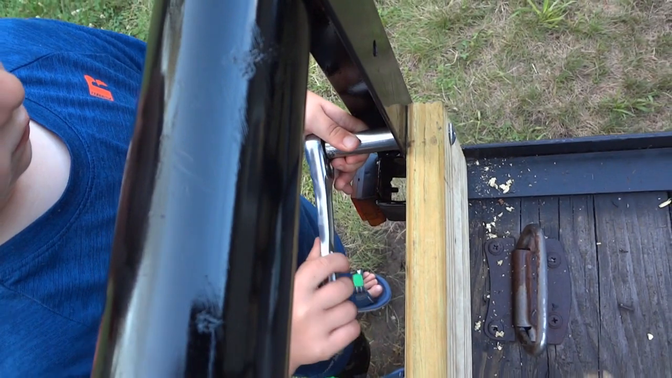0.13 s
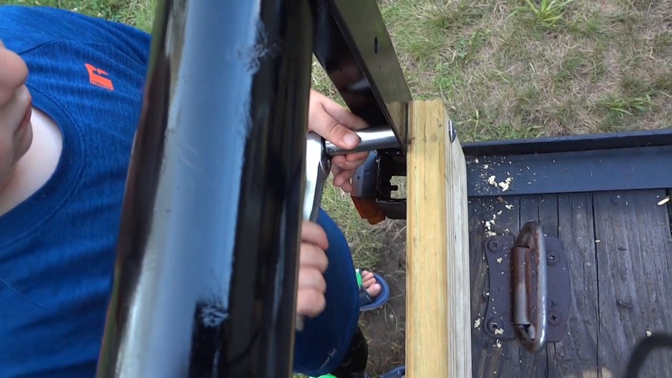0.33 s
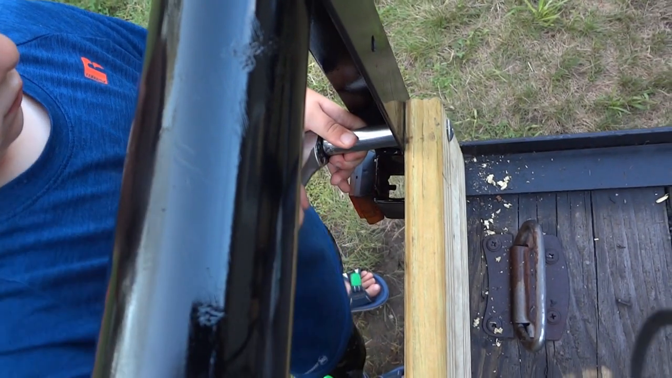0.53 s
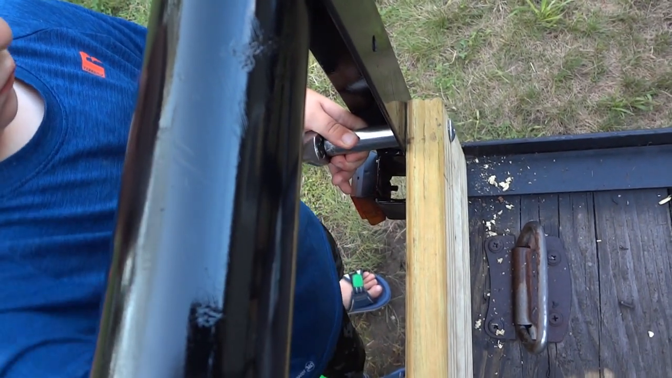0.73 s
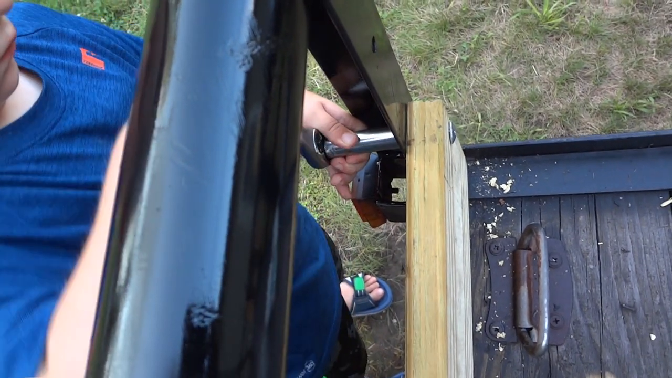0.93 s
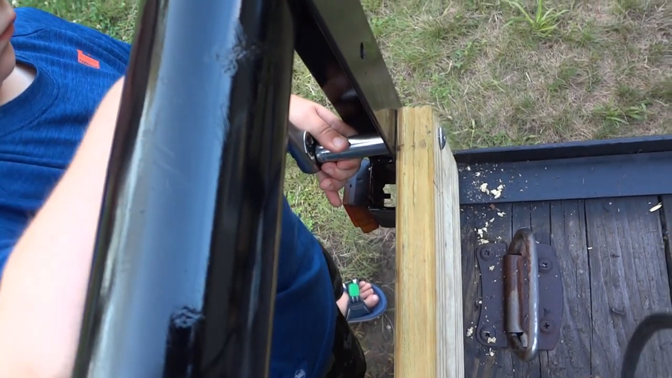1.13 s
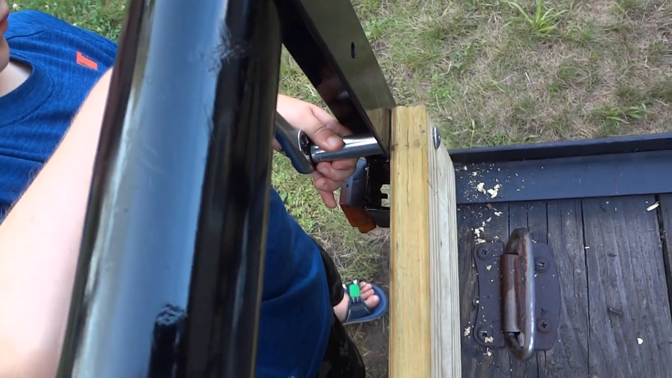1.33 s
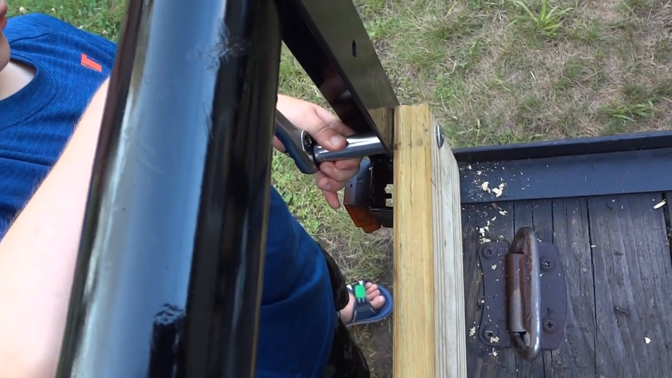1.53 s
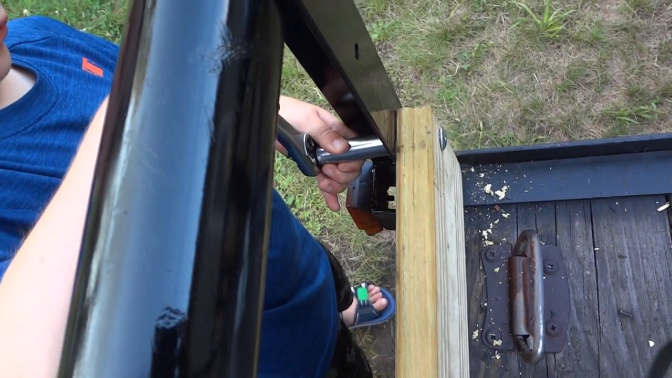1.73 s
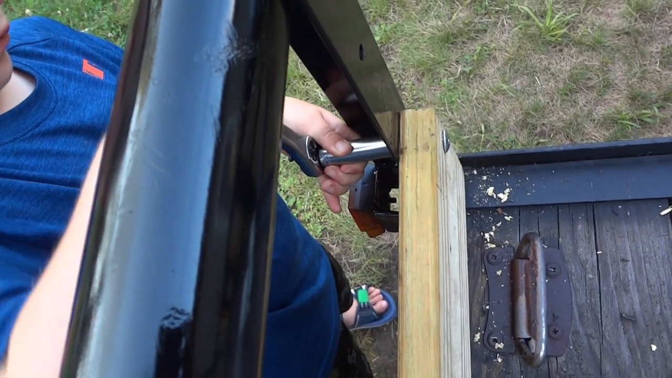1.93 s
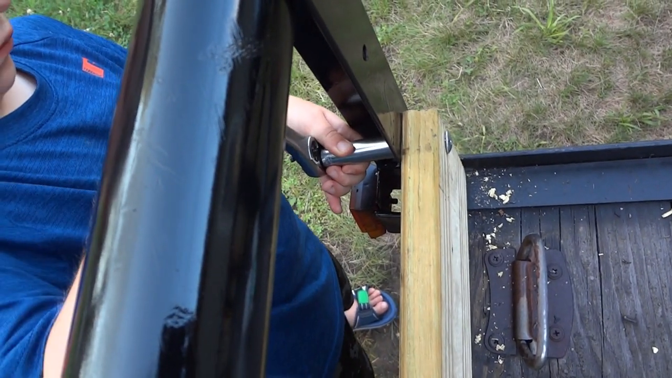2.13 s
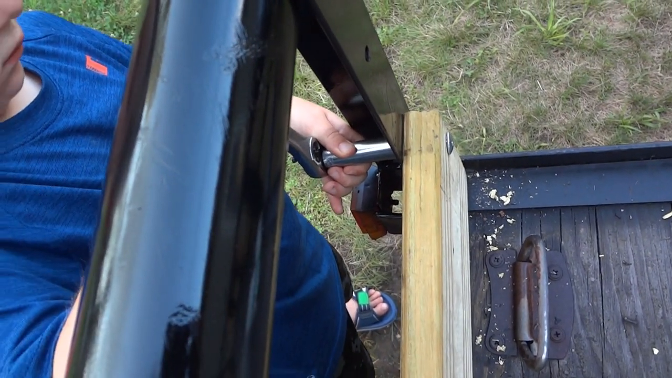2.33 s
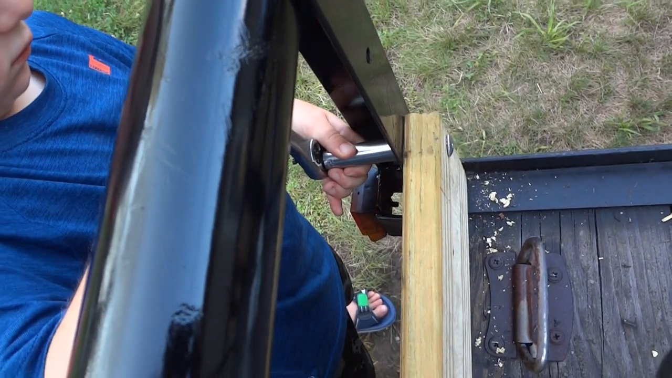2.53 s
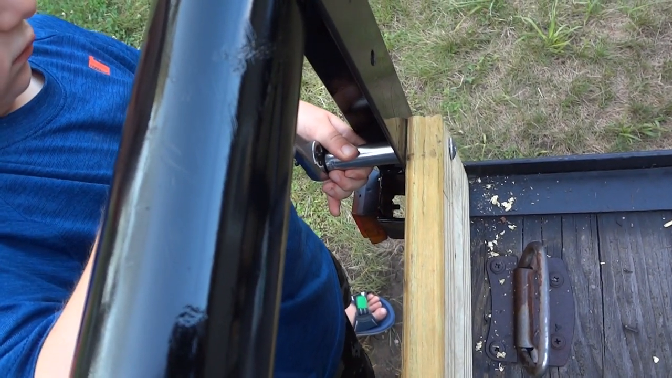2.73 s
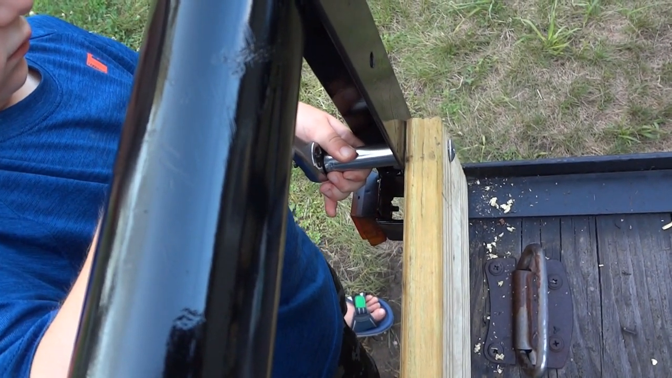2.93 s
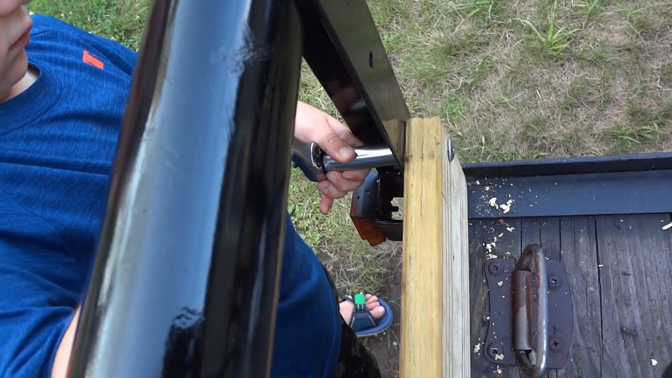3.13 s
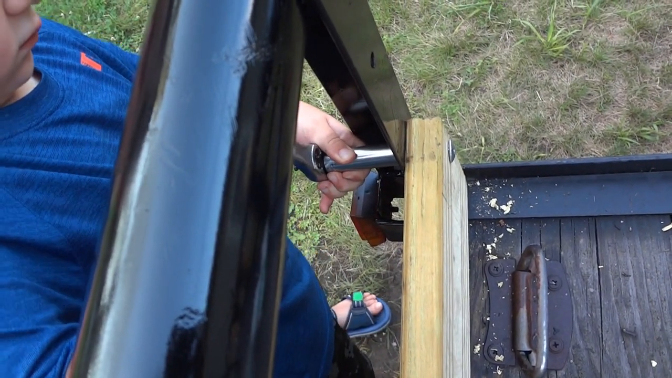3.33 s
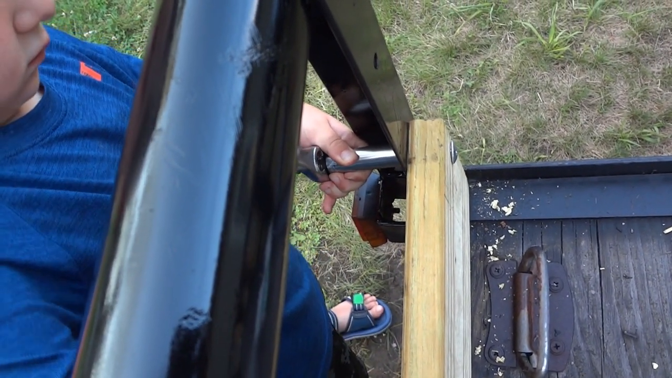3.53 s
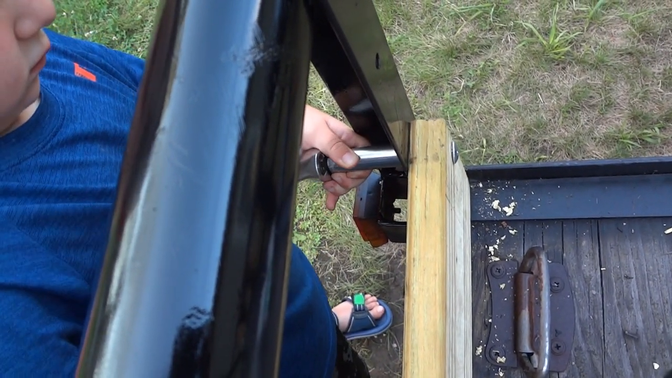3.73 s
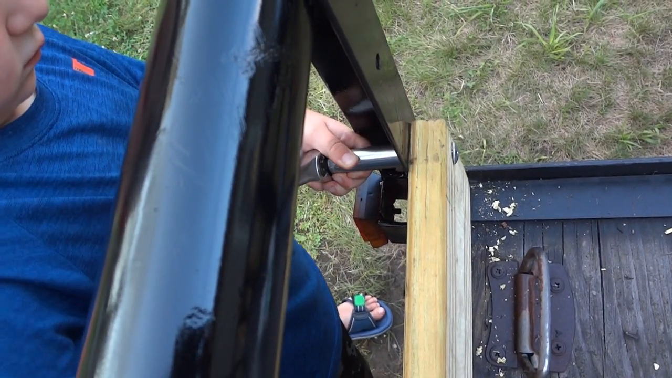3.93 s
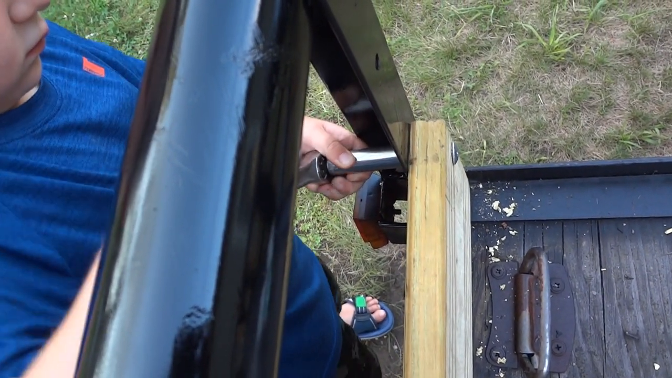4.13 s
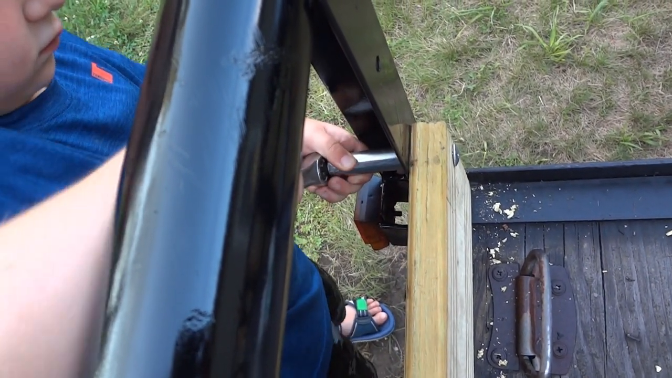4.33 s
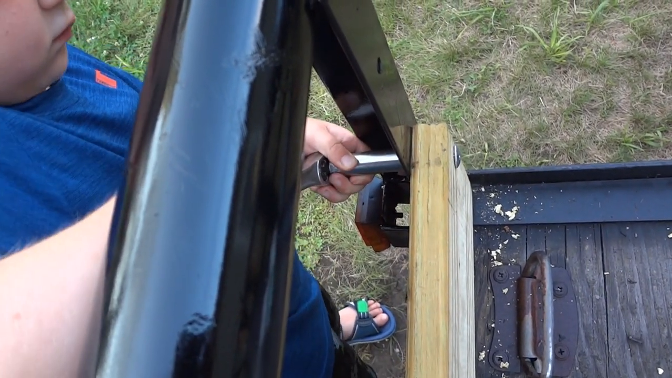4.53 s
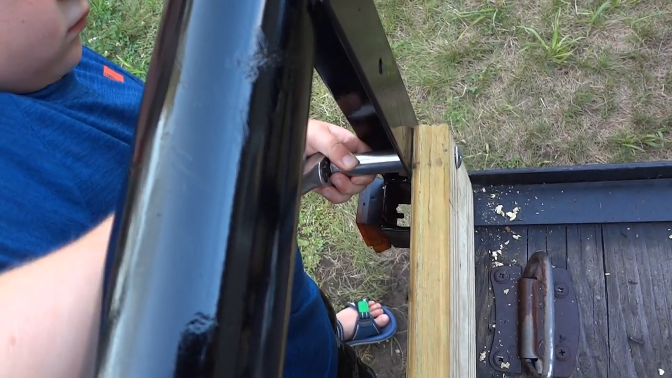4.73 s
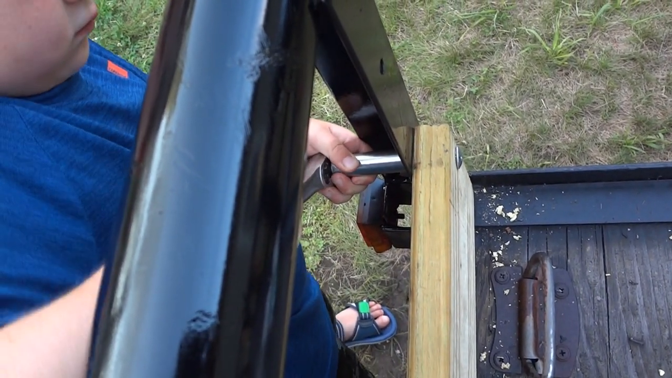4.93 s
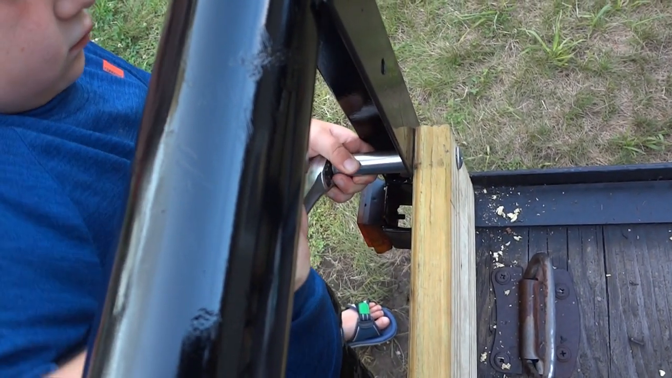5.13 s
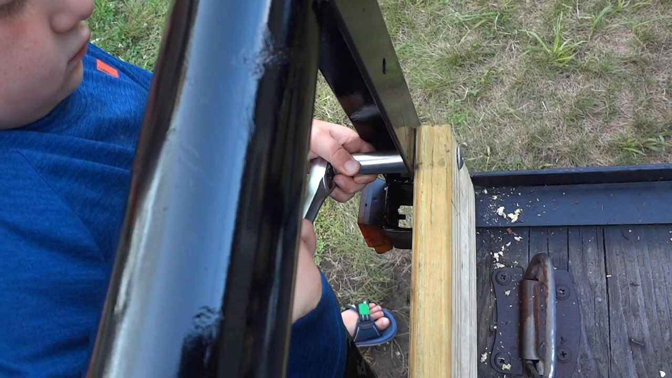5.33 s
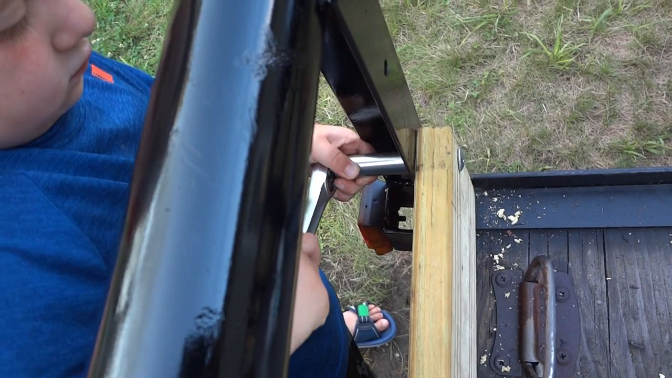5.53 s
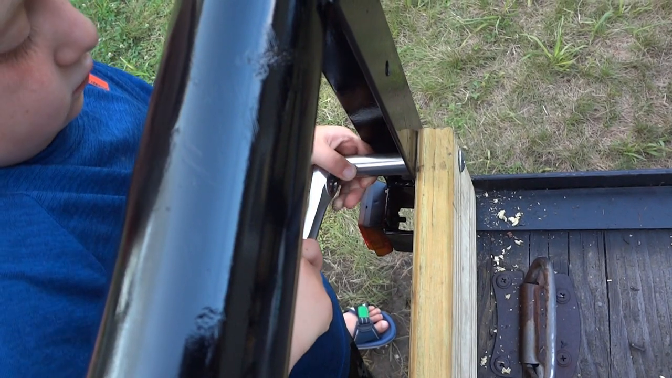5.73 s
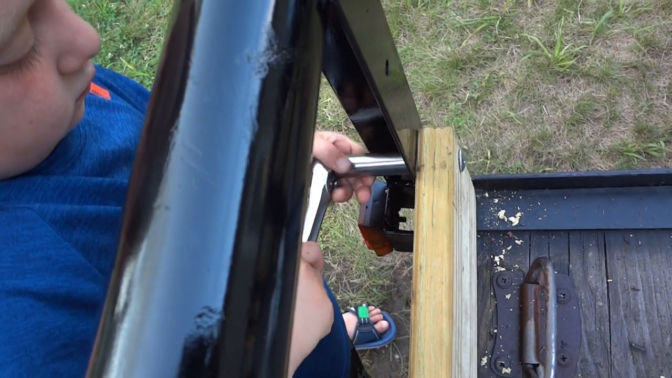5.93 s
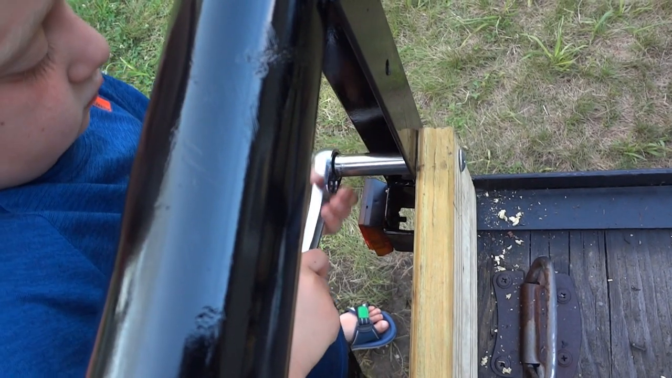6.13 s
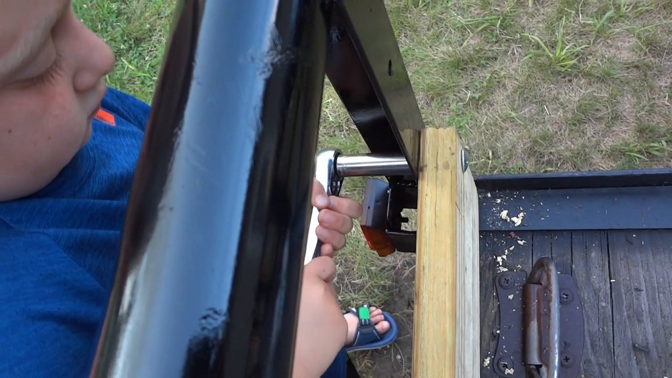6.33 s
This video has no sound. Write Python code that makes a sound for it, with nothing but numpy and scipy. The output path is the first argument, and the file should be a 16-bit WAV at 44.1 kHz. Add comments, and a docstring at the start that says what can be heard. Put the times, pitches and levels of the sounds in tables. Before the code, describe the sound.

Close to the microphone outdoors, a steel ratchet wrench clicks about ten times a second, each sharp pawl snap ringing briefly through the handle and trailer frame. After twelve clicks there is a gap, then one lone click at a second and a half. The rest is quiet open air with faint hand touches, a brief buzz of camera lens ticks and a very thin high whine.

```python
"""A socket ratchet is swung back on a trailer bolt, outdoors: the pawl snaps over thirteen teeth, the first already
ringing at the start. Each snap is a noise crack plus short damped modes, and it rings the steel handle (modes)
and the trailer frame (modes and decaying dense noise). A few faint touches and rubs of the hand are shaped noise.
The camera adds a thin whine of drifting sines and a short run of lens-motor ticks, over quiet open air."""
import sys
import numpy as np
from scipy import signal
from scipy.fft import rfft, irfft, next_fast_len
from scipy.io import wavfile
from scipy.ndimage import map_coordinates

SR = 44100
rng = np.random.default_rng(int(sys.argv[2]) if len(sys.argv) > 2 else 0)


def log_audio(samples):
    """Write samples as a 16-bit WAV file to the path given in sys.argv[1]."""
    # one column per channel
    frames = np.atleast_2d(samples).T
    # limit to full scale, then quantise
    limited = np.clip(frames, -1, 1)
    pcm = np.round(limited * 32767).astype(np.int16)
    wavfile.write(sys.argv[1], SR, pcm)


N = 286429
T = np.arange(SR // 2) / SR  # time within one hit, in seconds
TREBLE_DB = -42  # relative level of the handle's overtones, the same for every tooth


def amp(db):
    """Decibels to gain."""
    return 10 ** (np.asarray(db) / 20)


def unit(x):
    """Scale to rms 1."""
    return x / np.sqrt(np.mean(x ** 2) + 1e-20)


def along(points, hz):
    """Read (Hz, value) points on a log-frequency axis."""
    point_hz, values = np.transpose(points)
    return np.interp(np.log(hz + 1), np.log(point_hz + 1), values)


def bell(hz, centre_hz, octaves):
    """A smooth hump on a log-frequency axis."""
    return np.exp(-.5 * (np.log2((hz + 1) / centre_hz) / octaves) ** 2)


def filtered(x, response):
    """Multiply the spectrum of x by a response of frequency."""
    n = x.shape[-1]
    padded = next_fast_len(n + 8192)
    spectrum = rfft(x, padded) * response(np.fft.rfftfreq(padded, 1 / SR))
    return irfft(spectrum, padded)[..., :n]


def noise(gain, alike, size):
    """Stereo noise of rms 1 with a given colour and left-right likeness, set by the mid-side balance."""
    def mid_side_gain(hz):
        turn = np.arccos(np.clip(along(alike, hz), -1, 1)) / 2
        return gain(hz) * np.array([np.cos(turn), np.sin(turn)])

    mid, side = filtered(rng.standard_normal((2, size)), mid_side_gain)
    return unit(np.array([mid + side, mid - side]))


def fade(t60):
    """Exponential decay over one hit, 60 dB down after t60 seconds."""
    return np.exp(-np.log(1000) * T / t60)


def rise(seconds):
    """A soft start with the given time constant."""
    return 1 - np.exp(-T / seconds)


def ring(modes, scatter_db, spread):
    """Damped modes, struck at new strengths and detuned by the grip; the two microphones hear them out of step."""
    hz, db, t60 = np.transpose(modes)[:, :, None]
    size, phase, skew, grip = rng.standard_normal((4, len(modes), 1))
    wander = np.cumsum(rng.standard_normal((len(modes), len(T))), axis=1) * .0022
    cycles = hz * (1 + .0012 * grip) * T + phase + wander
    waves = [np.sin(2 * np.pi * cycles + side * spread * skew) for side in (1, -1)]
    return np.sum(amp(db + scatter_db * size) * fade(t60) * np.array(waves), axis=1)


def add(track, s, hit):
    """Mix a hit into the track at time s; it may have begun before time zero."""
    start = round(s * SR)
    hit = hit[:, max(-start, 0):]
    part = track[:, max(start, 0):][:, :hit.shape[1]]
    part += hit[:, :part.shape[1]]


def ratchet():
    """Each tooth snaps the pawl, which rings handle and frame; the frame's colour shifts as the handle swings."""
    # The pawl drops off a tooth. Each row: start in seconds, then relative levels in dB of the snap,
    # the spring's ping and the handle's ring.
    clicks = [(-0.006, -32, -35, -40), (0.1577, -23.5, -29, -45.5), (0.2735, -23.5, -22.5, -43),
              (0.3518, -28.5, -21, -44.5), (0.4272, -33, -23, -42.5), (0.5043, -27, -21.5, -39.5),
              (0.5889, -21.5, -24.5, -40.5), (0.685, -25.5, -24.5, -38.5), (0.7948, -19.5, -26.5, -34.5),
              (0.912, -20.5, -34.5, -36), (1.015, -19.5, -29, -34.5), (1.1323, -20.5, -24, -36),
              (1.501, -23, -33, -42)]
    # Reflections off the post, the deck and the ground. Each row: mean delay in seconds, mean level in dB.
    echoes = [(.0072, -18), (0.0094, -24), (.0198, -19), (.0255, -17.5), (.031, -31)]
    out, steel = np.zeros((2, N)), wash()
    for s, snap_db, ping_db, handle_db in clicks:
        low_db = swing_colour(s)
        snap = pawl_snap(snap_db, ping_db, handle_db)
        body = (frame_beam(low_db) + handle_ring(handle_db)) * rise(0.0073)
        add(out, s, snap + body + frame_ring(steel, low_db, handle_db))
        for delay, db in echoes:  # the paths change as the tool moves
            add(out, s + delay + rng.normal(0, 0.00093), amp(db + rng.normal(0, 1.5)) * snap)
    return out


def pawl_snap(snap_db, ping_db, handle_db):
    """Steel on steel: a broad crack, the short ring of wheel and pawl, the spring's ping, a knock to the head."""
    # Colour of the crack. Each row: frequency in Hz, relative level in dB per Hz.
    crack_colour = [(240, -73), (400, -35), (2320, -18), (3030, -6), (4680, -16.5), (7120, -4), (10200, -4),
                    (11200, -20), (15000, 6.5), (16500, -8.5)]
    # Modes of the toothed wheel, pawl, pawl spring and ratchet head.
    # Each row: frequency in Hz, relative level in dB, t60 in seconds.
    gear_modes = [(6560, -40, 0.011), (7870, -9, 0.023)]
    pawl_modes = [(12840, -0.5, 0.014), (14400, -13, 0.0116), (15040, -1, .013)]
    spring_modes = [(11170, 2.5, 0.012), (11400, 3.5, 0.011)]
    head_modes = [(2354, -10.5, 0.052), (3260, -10, 0.023), (4130, -3, 0.034), (4760, 0.5, 0.028),
                  (5170, -4, 0.029), (5700, 1, 0.0097), (6370, 4, 0.013)]
    pawl_db = -23  # the spring throws the pawl with the same force at every tooth
    crack = noise(lambda hz: amp(along(crack_colour, hz)), [(1000, 0.98)], len(T)) * fade(0.026)
    tooth = amp(snap_db) * (amp(-2.5) * crack + ring(gear_modes, scatter_db=5.5, spread=0.22))
    pawl = amp(pawl_db) * ring(pawl_modes, scatter_db=4.0, spread=0.11)
    spring = amp(ping_db + 2.5) * ring(spring_modes, scatter_db=3.5, spread=0.32)
    head = amp(handle_db + 9.5) * ring(head_modes, scatter_db=2.1, spread=.15)
    return (tooth + pawl + spring + head) * rise(0.00043)


def handle_ring(handle_db):
    """The steel handle, socket and bolt ring in damped modes, with a shimmer of high bending modes."""
    # Handle, socket and bolt, then the high bending modes.
    # Each row: frequency in Hz, relative level in dB, t60 in seconds.
    handle_modes = [(3962, -14, .11), (4436, -8, .16), (4497, -0.5, .23), (4552, -3, .21),
                    (4625, -3.5, .14), (4652, -1.5, .15), (4755, -2.5, .13), (4842, -7, .11),
                    (5157, -6, .13), (5275, -8.5, .12), (5428, -7.5, .14), (5528, -6.5, .15),
                    (6127, -11, .12)]
    overtones = [(8700, 1.5, .15), (10080, -6, .09), (13750, -1, .125)]
    handle = amp(handle_db + 4.5) * ring(handle_modes, scatter_db=1, spread=.15)
    shimmer = amp(TREBLE_DB - 2) * ring(overtones, scatter_db=1.5, spread=.15)
    return handle + shimmer


def swing_colour(s):
    """The frame's low-ring level over frequency: a hump that moves as the handle swings."""
    # Each row: time in seconds, strongest frequency in Hz, relative level in dB.
    swing = [(0, 1120, -44), (.27, 1130, -44), (.36, 1370, -47), (.8, 2100, -46.5), (1.05, 1900, -43),
             (1.5, 1500, -47)]
    times, *columns = np.transpose(swing)
    centre_hz, frame_db = [np.interp(s, times, column) for column in columns]
    return lambda hz: frame_db - 1 + 8 * bell(hz, centre_hz, octaves=0.45)


def frame_beam(low_db):
    """The frame's clearest modes, weighted by the colour of the swing."""
    # Each row: frequency in Hz, relative level in dB, t60 in seconds.
    beam_modes = [(473, -11.5, 0.19), (573, -9.5, 0.13), (780, -8, 0.055), (1063, -11.5, 0.062),
                  (1176, -2, 0.12), (1537, -5.5, 0.1), (1598, -19, 0.57), (2116, -2, 0.14),
                  (2437, -3.5, 0.19)]
    coloured = [(hz, db + low_db(hz) - 3.5, t60) for hz, db, t60 in beam_modes]
    return ring(coloured, scatter_db=4.5, spread=0.184)


def frame_ring(steel, low_db, handle_db):
    """The dense ring of the frame, partly the same for every blow; it builds up, then the treble dies first."""
    # Each row: frequency in Hz, t60 in seconds.
    frame_decay = [(400, .25), (1500, .17), (4500, .128), (8000, .105), (15000, .097)]
    hz, t, bins = signal.stft(0.14 * steel + 0.74 * wash(), SR, nperseg=256)
    handle_colour = along([(4500, handle_db + 9.0), (8000, TREBLE_DB + 24.5)], hz)
    colour_db = np.where(hz < 3000, low_db(hz) + 17.5, handle_colour)  # frame below, handle above
    decay = np.exp(-np.log(1000) * t / along(frame_decay, hz)[:, None])
    gain = amp(colour_db + 5.0)[:, None] * decay
    return signal.istft(bins * gain, SR, nperseg=256)[1][:, :len(T)] * rise(0.03)


def wash():
    """Countless close modes as noise, bunched unevenly along frequency."""
    # The frame's dense ring. Each row: frequency in Hz, relative level in dB per Hz.
    frame_colour = [(50, -52), (150, -19), (300, -10.5), (480, -10), (800, -4.5), (1300, -1.5), (2300, 1.5),
                    (3200, 3.5), (4700, 13.5), (6000, 8.5), (7300, -3), (9500, -3.5), (11300, -2.5),
                    (15300, -5.5)]
    knots = np.linspace(0, SR / 2, num=190)
    bunching_db = 7 * rng.uniform(-0.48, 1, len(knots))
    colour = lambda hz: amp(along(frame_colour, hz) + np.interp(hz, knots, bunching_db))
    return noise(colour, [(500, 1.0), (2000, 0.93), (6000, 0.9)], len(T))


def yard(x):
    """A dull, late answer from the surroundings: the sound convolved with a decaying noise tail."""
    tail = noise(lambda hz: bell(hz, centre_hz=900, octaves=1.5), [(1000, .1)], len(T)) * fade(0.56) * rise(0.035)
    return signal.fftconvolve(x, tail / np.linalg.norm(tail[0]), axes=1)[:, :N]


def touches():
    """Socket and fingers tap the steel: a narrow noise ring over a broad tick, damped at once by the hand."""
    # Each row: start in seconds, relative level in dB, centre in Hz.
    taps = [(0.7578, -32.5, 3450), (2.053, -44.5, 13000), (3.725, -56.5, 9900), (6.0112, -55, 1980),
            (6.06, -52, 695)]
    out = np.zeros((2, N))
    for s, db, centre_hz in taps:
        band = lambda octaves: noise(lambda hz: bell(hz, centre_hz, octaves), [(1000, 0.89)], len(T))
        tap = band(octaves=0.16) + amp(-1.5) * band(octaves=2.4)
        add(out, s, amp(db) * tap * fade(0.014) * rise(0.00011))
    return out


def rubs():
    """Hand and cloth slide over the tool: faint brushes of noise, each a smooth swell."""
    # Each row: middle in seconds, level at the middle in dB, half length in seconds, centre in Hz.
    brushes = [(2.023, -59, 0.016, 6840), (3.055, -68.5, .089, 5860), (4.517, -67.5, 0.017, 260),
               (4.566, -65, 0.014, 7000)]
    out, t = np.zeros((2, N)), np.arange(N) / SR
    for s, db, half_s, centre_hz in brushes:
        swell = np.exp(-.5 * ((t - s) / half_s) ** 2)
        out += amp(db) * swell * noise(lambda hz: bell(hz, centre_hz, octaves=.6), [(1000, 0.9)], N)
    return out


def lens_motor():
    """Sixty steps a second, slowly growing; every other one is harder and rebounds, duller, in the housing."""
    # Modes of the lens housing. Each row: frequency in Hz, relative level in dB, t60 in seconds.
    housing_modes = [(2360, -25, .025), (3290, -21, .025), (4620, -10, .008), (7640, 0, .005),
                     (8020, -4, .005), (11050, -1, .003), (12580, -1, .005)]
    run_start_s, step_s, step_count = 4.1443, .0167, 7
    step_db, step_growth_db = -45.5, .5  # relative level of the first step, and the gain per step
    accent_db, rebound_db, rebound_s = 1.5, -5.5, 0.0022
    out = np.zeros((2, N))
    for k in range(step_count):
        crack = noise(lambda hz: bell(hz, centre_hz=7860, octaves=0.94), [(1000, 0.35)], len(T)) * fade(0.0018)
        tick = (amp(8) * crack + ring(housing_modes, scatter_db=1.5, spread=0.17)) * rise(.0001)
        s, db = run_start_s + k * step_s, step_db + k * step_growth_db
        if k % 2 == 0:
            db += accent_db
            dull = filtered(tick, lambda hz: 1 / (1 + (hz / 4500) ** 4))
            rebound = unit(dull) * np.std(tick)  # as strong as the tick before its own gain
            add(out, s + rebound_s, amp(db + rebound_db) * rebound)
        add(out, s, amp(db) * tick)
    return out * amp([[1.5], [-1.5]])  # leans to the left


def background():
    """Wide open-air hush with microphone hiss, a faint hum and the camera's thin, wavering whine."""
    # Open air and hiss. Each row: frequency in Hz, relative level in dB per Hz.
    air_colour = [(20, -22), (45, -11), (70, -14), (100, -2.5), (135, -9.5), (180, -4.5), (300, -1.5),
                  (500, 0.5), (850, 1), (1700, -2.5), (3500, -8.5), (7500, -14), (12000, -14.5),
                  (16000, -17)]
    # Width of the air. Each row: frequency in Hz, left-right likeness from -1 to 1.
    air_likeness = [(60, 0.78), (130, 0.77), (290, -0.18), (640, -0.59), (1410, -0.53), (3100, -0.11),
                    (6820, 0.67), (15000, 0.82)]
    # Hum and whine. Each row: frequency in Hz, relative level in dB.
    whine_tones = [(172.3, -88), (6772, -88.5), (12225, -84), (12290, -87.5), (13485, -85.5)]
    waver_db, wavers_per_s = 3.5, 14  # scale of the random level knots, and their rate
    air = amp(-61) * noise(lambda hz: amp(along(air_colour, hz)), air_likeness, N)
    t = np.arange(N) / SR
    whine = 0
    for hz, db in whine_tones:
        knots = rng.standard_normal(int(t[-1] * wavers_per_s) + 2)
        waver = waver_db * map_coordinates(knots, [t * wavers_per_s])
        drift = np.cumsum(rng.standard_normal(N)) * 0.0313  # phase, in radians
        whine = whine + amp(db + 5.5 + waver) * np.sin(2 * np.pi * hz * t + drift)
    return air + whine


def scene():
    """Tool and its surroundings, hand, camera and open air."""
    tool = ratchet()
    return tool + amp(-20.5) * yard(tool) + touches() + rubs() + lens_motor() + background()


def record(dry):
    """The camera's band limit: a very steep treble cut."""
    top_hz = 16150
    return filtered(dry, lambda hz: 1 / (1 + (hz / top_hz) ** 120))


dry = scene()
out = record(dry)
log_audio(out)
```